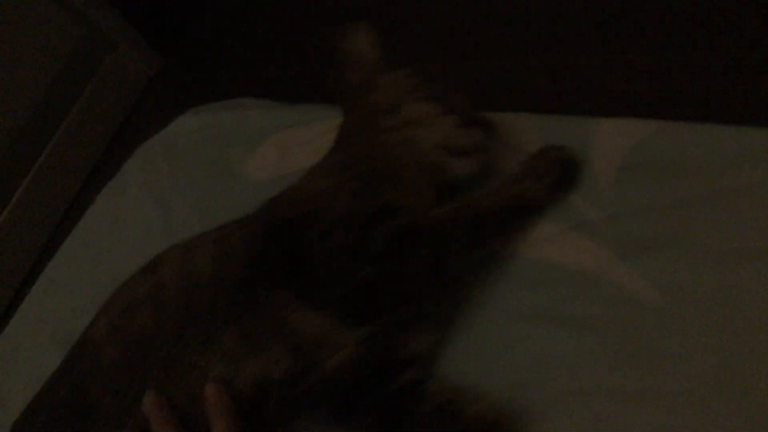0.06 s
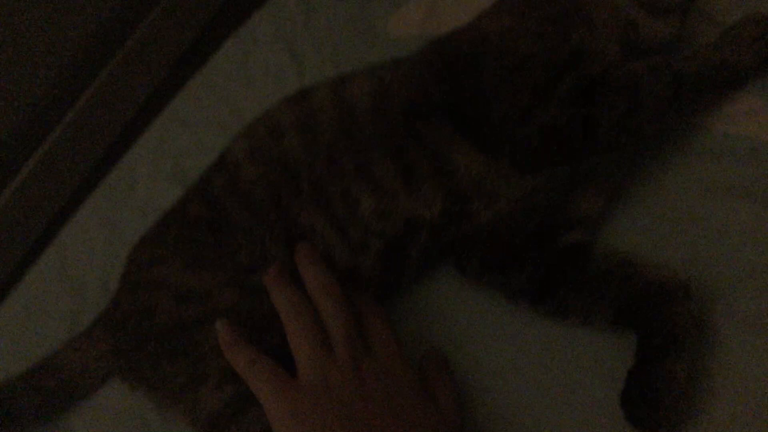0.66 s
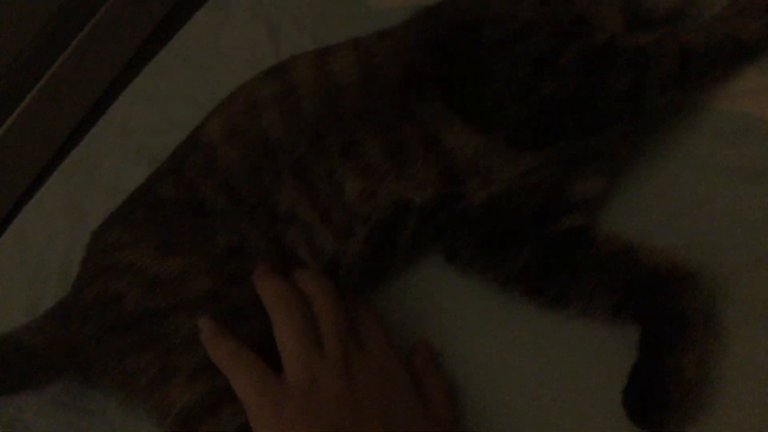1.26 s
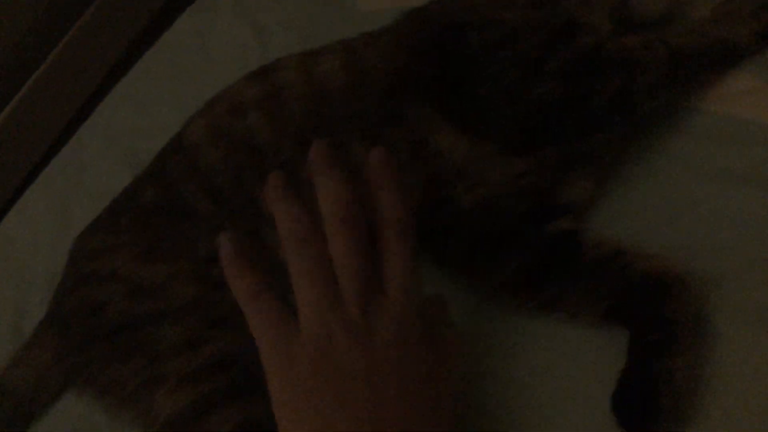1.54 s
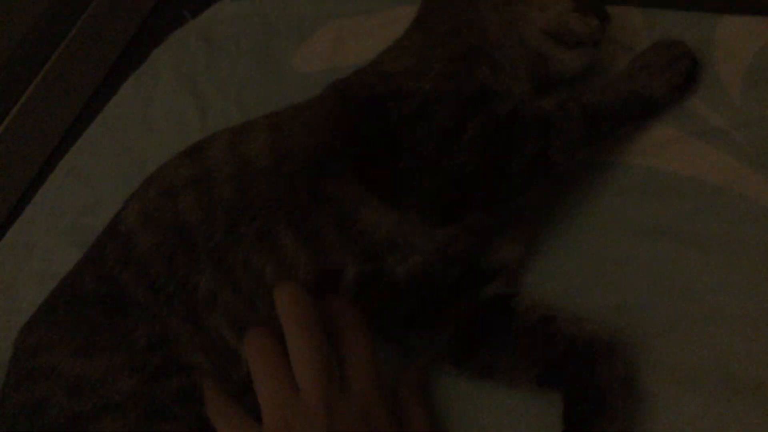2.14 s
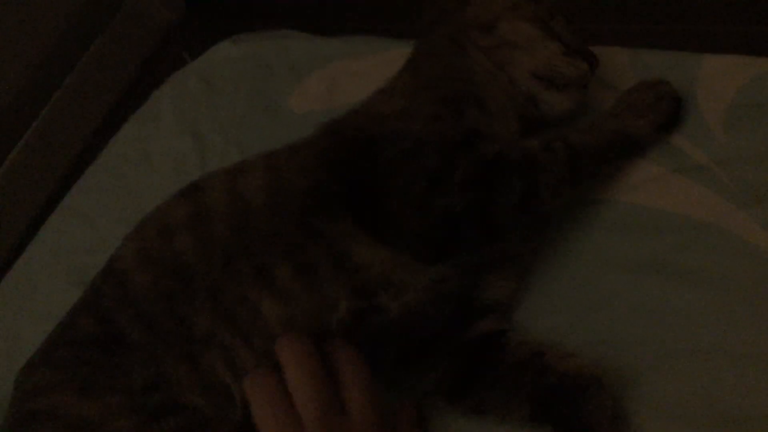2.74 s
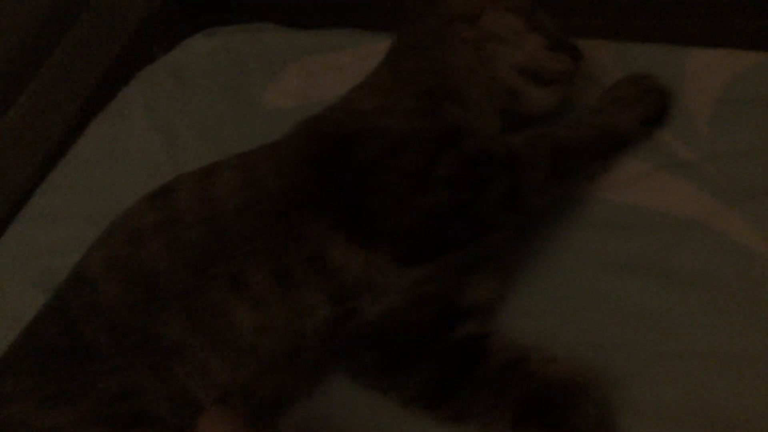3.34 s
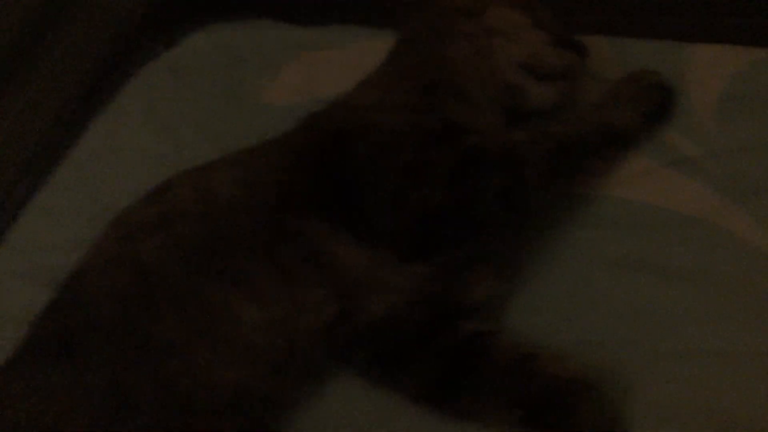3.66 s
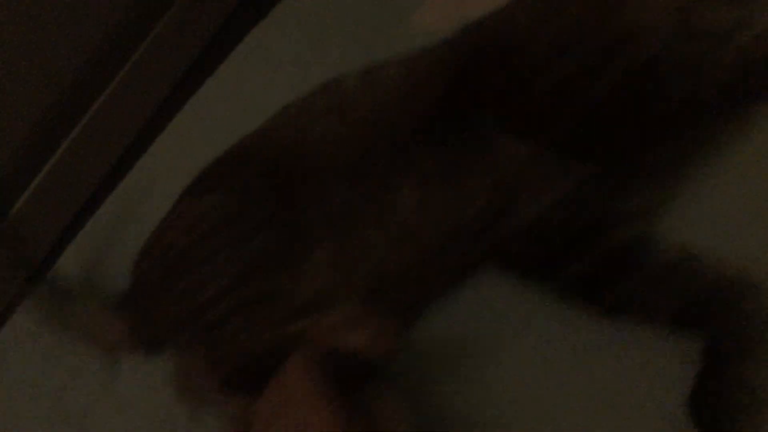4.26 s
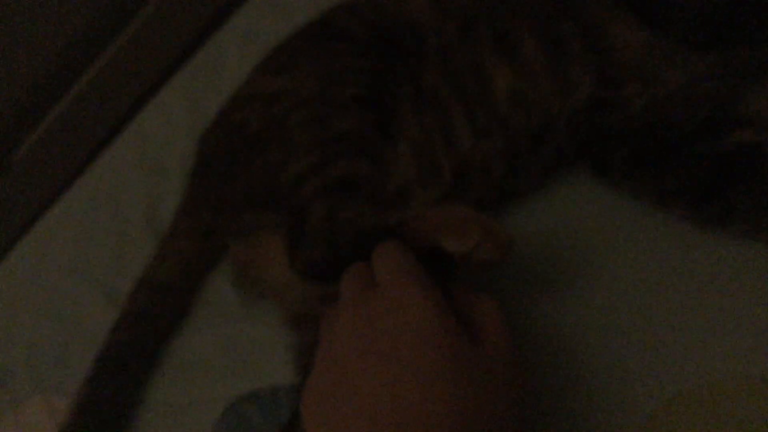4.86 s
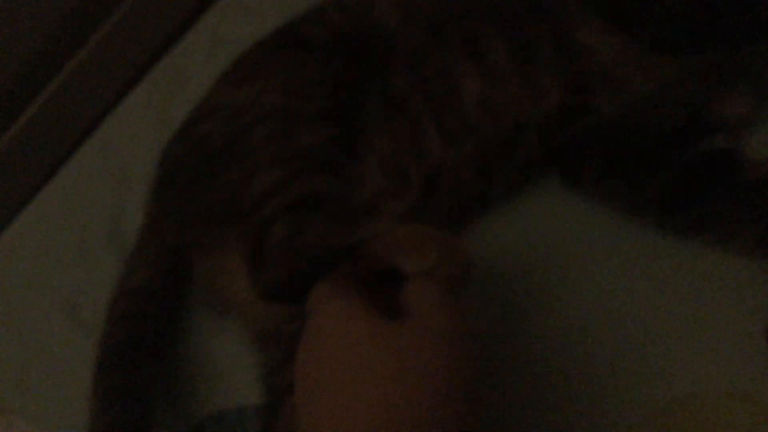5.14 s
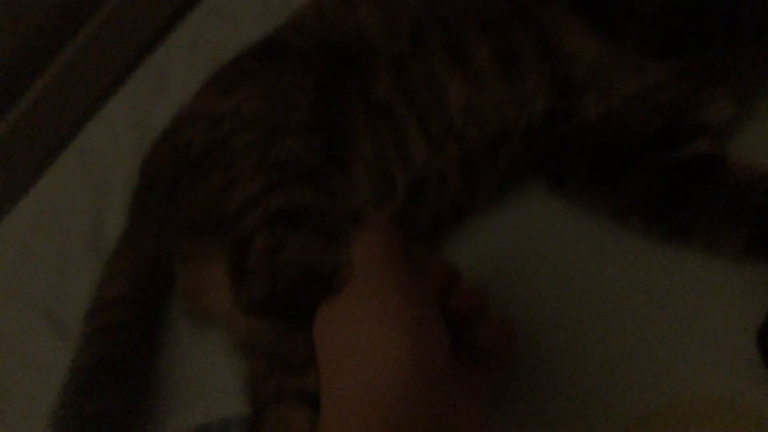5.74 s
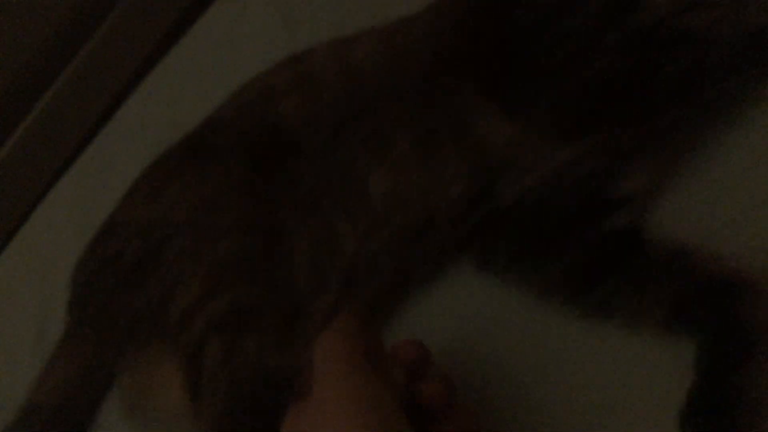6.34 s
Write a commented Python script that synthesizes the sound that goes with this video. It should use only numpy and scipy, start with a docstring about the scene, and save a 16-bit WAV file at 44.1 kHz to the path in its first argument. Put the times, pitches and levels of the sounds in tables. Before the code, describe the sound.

A quiet room holds a low motor hum, perhaps a fan, throbbing about three times a second over a faint, even hiss. A hand stroking a cat on bedding makes a brief soft sweep at the very start, then a barely audible rustle throughout. Something loose gives five dull, similar knocks at about 0.8, 1.9, 3.0, 4.0 and 5.4 seconds, each with a tiny bounce and a short room echo. Right at the microphone, fingers slip on the camera, each slip a scuff, tick and low thump, at about 0.6, 0.9, 1.5, 3.0 and 4.9 seconds, with a weaker one at 5.4. The strongest, near 4.9, is followed by a few soft bumps. The palm adds low rumbles, and muffled rubs come between 3.7 and 4.5 seconds. After a slight rumble at 6 seconds, the hum carries on to the end.

```python
"""A quiet room, where a hand strokes a cat on bedding and a motor, perhaps a fan, hums with a slow throb.
Fur and sheet rustle faintly over an even hiss. Up close, fingers shift on the camera: the palm rubs
and rumbles, and each slip scuffs, ticks and thumps the case. Five dull, alike knocks of something
loose bounce briefly and die away in the room."""
import sys
import numpy as np
from scipy import signal
from scipy.fft import rfft, irfft, next_fast_len
from scipy.io import wavfile
from scipy.ndimage import uniform_filter1d

SR = 44100
rng = np.random.default_rng(int(sys.argv[2]) if len(sys.argv) > 2 else 0)


def unload_wav(signal):
    """Save mono or channel-first audio to the path in sys.argv[1] as 16-bit WAV at rate SR, clipped to [-1, 1]."""
    wavfile.write(
        sys.argv[1],
        SR,
        np.round(np.clip(np.atleast_2d(signal).T, -1, 1) * 32767).astype(np.int16),
    )


N = 290590
TIME = np.arange(N) / SR


def undb(db):
    """Decibels to gain."""
    return 10 ** (np.asarray(db) / 20)


def colour(x, eq):
    """EQ a sound with a (frequency [Hz], level [dB]) curve and bring it to rms 1."""
    hz, db = np.transpose(eq)
    size = next_fast_len(len(x), True)
    bins = np.maximum(np.fft.rfftfreq(size, 1 / SR), 1)
    gain = undb(np.interp(np.log(bins), np.log(hz), db))
    y = irfft(rfft(x, size) * gain, size)[:len(x)]
    return y / np.std(y)


def noise(eq):
    """Smooth, coloured noise."""
    return colour(rng.standard_normal(N), eq)


def drift(rate):
    """Random modulator: values held 1 / rate seconds and slewed twice."""
    hold = int(SR / rate)
    steps = np.repeat(rng.standard_normal(N // hold + 1), hold)[:N]
    y = uniform_filter1d(uniform_filter1d(steps, hold), hold)
    return y / np.std(y)


def friction(eq, grain_db):
    """Grainy rub: dense tiny slips of uneven size."""
    return colour(rng.standard_normal(N) * undb(grain_db * np.clip(drift(1500), -2, 2)), eq)


def swell(start, attack_s):
    """Envelope with a quick attack to 1 and a slower release."""
    age = np.maximum(TIME - start, 0) / attack_s
    return age * np.exp(1 - age)


def decay(t, t60):
    """Envelope that falls 60 dB in t60 seconds."""
    return np.exp(-np.log(1000) * t / t60)


def strike(start, modes, contact_s, pitch=1):
    """Modes rung by a soft push; a longer contact is duller."""
    t = TIME[:SR // 5]
    ring = sum(np.sign(polarity) * undb(db) * np.sin(2 * np.pi * hz * pitch * t) * decay(t, t60)
               for hz, db, t60, polarity in modes)
    push = np.sin(np.pi * np.minimum(t / contact_s, 1)) ** 2
    ring = signal.fftconvolve(ring, push / push.sum())[:len(t)]
    return np.interp(TIME, t + start - contact_s / 2, ring, left=0, right=0)


# Dark room air and bright microphone hiss: (frequency [Hz], level [dB])
AIR_EQ = [(22, -41), (33, -11), (45, -15), (70, 0.5), (95, -2.5), (130, 3.5), (185, 0), (230, -9.5),
          (280, -8.5), (345, -13), (420, -21.5), (750, -24), (920, -29.5), (1200, -27), (2500, -40),
          (6000, -57)]
HISS_EQ = [(500, -2.5), (3000, 7.5), (5500, 2.5), (7600, 0.5), (8300, 3.5), (9500, 4), (10300, 1),
           (12000, 2), (13700, -5), (14400, -21), (15200, -24)]

def room_tone(air_db=-59.0, hiss_db=-85.0, waver_db=0.43):
    """The bed: low room noise under the even hiss of the microphone."""
    return undb(air_db + waver_db * drift(6.0)) * noise(AIR_EQ) + undb(hiss_db) * noise(HISS_EQ)


# Faint side tones of the motor: (frequency [Hz], level [dB])
MOTOR_TONES = [(48.5, -72.5), (194, -70.5), (264, -80), (291.5, -80.5), (629.8, -89.5), (872.1, -93),
               (921.5, -101)]

def motor_hum(pitch_hz=146.14, level_db=-54.5, throb_db=2.5, period_s=0.335, crest_s=0.28):
    """One strong motor tone throbs three times a second over a few faint, wavering ones."""
    throb = np.cos(2 * np.pi * (TIME - crest_s) / period_s)
    main = undb(level_db + throb_db * throb) * np.sin(2 * np.pi * pitch_hz * TIME + 0.067 * drift(8.2))
    faint = sum(undb(db + 2 * drift(5.5)) * np.sin(2 * np.pi * hz * TIME + drift(2))
                for hz, db in MOTOR_TONES)
    return np.sqrt(2) * (main + faint)


# Fader ride of the hand sweeping onto the fur and coming to rest: (time [s], level [dB])
SWEEP_FADE = [(0, -65), (.06, -77), (.13, -80), (.22, -104), (.3, -110)]
# Soft rustle of the petting and of the sweep: (frequency [Hz], level [dB])
FUR_EQ = [(300, -6), (700, 7.5), (1400, 2), (2100, 6), (3000, 0), (4000, -11), (6000, -7.5), (8000, -23),
          (14000, -39)]
SWEEP_EQ = [(500, -2), (1300, -5), (2200, -2), (3000, -12.5), (3900, -11.5), (5000, -19), (9000, -27)]

def fur_strokes(level_db=-83.5, pressure_db=0.05, flutter_db=2.0):
    """Hairs and threads slip under the hand: one brisk sweep, then light, fluttering petting."""
    touch = undb(level_db + pressure_db * drift(2.5) + flutter_db * drift(25))
    petting = touch * friction(FUR_EQ, grain_db=0.5)
    sweep = undb(np.interp(TIME, *np.transpose(SWEEP_FADE))) * friction(SWEEP_EQ, grain_db=4.5)
    return petting + sweep


# Cues for the camera turning in the hand: (peak time [s], half length [s], level [dB])
TURN_CUES = [(0.667, 0.11, -66), (3.718, .14, -64), (3.965, .06, -67.5), (4.485, .13, -67)]
# Their muffled tone: (frequency [Hz], level [dB])
TURN_EQ = [(120, -21), (220, -2), (320, 1.5), (400, -12.5), (550, -23), (800, -22.5), (1500, -33),
           (6000, -55)]

def case_turns():
    """The case rolls against the palm: a dull rub swells and fades."""
    speed = sum(undb(db) * np.exp(-((TIME - peak) / half) ** 2) for peak, half, db in TURN_CUES)
    return speed * friction(TURN_EQ, grain_db=4)


# Cues for the palm dragging as the grip settles: (time [s], rumble level [dB], hiss level [dB])
DRAG_CUES = [(0.603, -51.5, -79), (0.927, -50.5, -76.5), (1.54, -56.5, -100), (2.03, -57.5, -84.5),
             (3.05, -52.5, -85), (3.58, -77, -78), (4.26, -61, -87), (5.016, -50.5, -75.5),
             (5.17, -56.5, -89), (6.0, -62, -81)]
# The drag's low end and airy top: (frequency [Hz], level [dB])
RUMBLE_EQ = [(30, -49), (50, -17), (68, 9), (100, 1), (200, -3.5), (400, -30), (900, -76)]
SKIN_EQ = [(1000, 7), (4000, 2), (7000, -4.5), (12000, -5), (15500, -13)]

def palm_drags(attack_s=0.047):
    """The palm creeps on the case and settles: a rumble through the body and a thin hiss."""
    rumble, hiss = noise(RUMBLE_EQ), friction(SKIN_EQ, grain_db=3.5)
    return sum(swell(start, attack_s) * (undb(rumble_db) * rumble + undb(hiss_db) * hiss)
               for start, rumble_db, hiss_db in DRAG_CUES)


# Body of the hand-damped case: (frequency [Hz], level [dB], decay t60 [s], polarity [+/-])
CASE_MODES = [(169, 6, 0.012, -1), (118.4, 0.5, 0.03, 1), (365, -7.5, 0.023, 1), (573, -12.5, 0.012, -1)]

def case_thump(start, contact_s):
    """A push on the case gives a low, choked thump."""
    return strike(start, CASE_MODES, contact_s)


# Cues for fingers settling on the case: (time [s], level [dB], contact [s])
BUMP_CUES = [(0.6244, -29, 0.0041), (4.9363, -34, 0.003), (4.9465, -28, 0.0034), (5.045, -36.5, 0.0035),
             (5.057, -33.5, 0.0047)]

def finger_bumps():
    """Finger pads land softly, without a slip."""
    return sum(undb(db) * case_thump(start, contact_s) for start, db, contact_s in BUMP_CUES)


def case_sway(start, hz, t60=0.12, attack_s=0.0057, lag_s=0.011):
    """Bass tail of a thump: the camera wobbles in the hand."""
    t = np.maximum(TIME - start - lag_s, 0)
    return 2 * np.sin(2 * np.pi * hz * t) * (1 - np.exp(-t / attack_s)) * decay(t, t60)


# Skin scraping the case, before the tilt: (frequency [Hz], level [dB])
SCUFF_EQ = [(300, -1), (720, 9.5), (950, -1), (1300, 2.5), (2200, -0.5), (3400, -0.5), (4100, -5),
            (5800, -8.5), (7500, -20), (9500, -14.5), (10800, -17.5), (12500, -18), (15500, -18)]

def skin_scuff(catch, tilt_db, slip_s=0.0045, stop_s=0.0011, tail_s=0.066, tail_db=-19, grain_db=4):
    """Skin slides ever harder in tiny jerks, then sticks; a faint rustle lingers."""
    t = TIME[:SR // 4] - TIME[SR // 20]  # zero at the catch
    jerks = rng.standard_normal(len(t)) * undb(grain_db * np.clip(drift(4000)[:len(t)], -2, 2))
    skin = colour(jerks, [(hz, db + tilt_db * np.log2(hz)) for hz, db in SCUFF_EQ])
    before, after = np.minimum(t, 0), np.maximum(t, 0)
    release = np.exp(-after / stop_s) + undb(tail_db) * np.exp(-after / tail_s)
    speed = np.exp(before / slip_s) * release
    return np.interp(TIME, t + catch, speed * skin, left=0, right=0)


# Cues for fingers slipping: (time [s], scuff level [dB], tick level [dB], thump level [dB],
# contact [s], thump lag [s], sway frequency [Hz], sway level against the thump [dB])
SLIP_CUES = [(0.605, -52.5, -53, -29.5, 0.0039, -0.0051, 85, -18.5),
             (0.9229, -53.5, -56.5, -21.5, 0.0028, 0.0003, 61, -28),
             (1.538, -56.5, -52.5, -24.5, 0.007, 0.0026, 72, -23),
             (3.0384, -50.5, -49.5, -21, 0.0014, 0.00028, 67, -23),
             (4.928, -50, -54.5, -17, 0.0028, -.0002, 68, -20.5),
             (5.44, -60.5, -60, -32.5, 0.0019, -0.0051, 76, -15)]
# Bright ring of the hard shell: (frequency [Hz], level [dB], decay t60 [s], polarity [+/-])
SHELL_MODES = [(696, -14, 0.08, 1), (803, -12.5, 0.2, 1), (1100, -12.5, 0.073, 1), (1280, -21.5, 0.12, 1),
               (2072, -11, 0.05, -1), (2480, -33, 0.043, 1), (3190, -15, 0.049, 1), (4500, -33, 0.024, -1),
               (5270, -20, 0.033, 1), (6660, -31, 0.0091, -1), (8900, -11.5, 0.0089, 1),
               (12900, -8, 0.002, -1)]

def finger_slips(rebound_s=0.0138, rebound_db=-13.0, pitch_spread=0.025, flat_db=-20, tilt_per_db=0.47):
    """A finger scuffs and catches with a tick; the case thumps, rebounds and sways."""
    mix = 0
    pitches = 1 + pitch_spread * rng.standard_normal(len(SLIP_CUES))  # each finger spot rings differently
    for cue, pitch in zip(SLIP_CUES, pitches):
        start, scuff_db, tick_db, thump_db, contact_s, lag_s, sway_hz, sway_db = cue
        tick = strike(start, SHELL_MODES, 3 / SR, pitch)
        tilt_db = tilt_per_db * (thump_db - flat_db)  # per octave: a firmer grip scuffs brighter
        mix += undb(scuff_db) * skin_scuff(start, tilt_db) + undb(tick_db) * tick
        hit = start + lag_s
        thump = case_thump(hit, contact_s) + undb(rebound_db) * case_thump(hit + rebound_s, contact_s)
        mix += undb(thump_db) * (thump + undb(sway_db) * case_sway(hit, sway_hz))
    return mix


# Dark tone of the room's reverb: (frequency [Hz], level [dB])
REVERB_EQ = [(50, 10.5), (110, -6.5), (200, 3), (270, -4), (360, -0.5), (500, -4), (900, 8), (3000, -21),
             (9000, -50)]

def room_reverb(x, t60=0.49, wet_db=-6.5, build_s=0.029):
    """Diffuse reflections build up and die away."""
    t = TIME[:SR]
    tail = noise(REVERB_EQ)[:SR] * decay(t, t60) * (1 - np.exp(-(t / build_s) ** 2))
    low_mids = np.abs(rfft(tail))[100:400]  # the wet level holds for 100-400 Hz
    return undb(wet_db) * signal.fftconvolve(x, tail)[:N] / np.sqrt(np.mean(low_mids ** 2))


# Cues for the knocks: (time [s], level [dB], rasp level against the knock [dB], pitch [ratio])
KNOCK_CUES = [(0.7704, -32.5, -36, 0.98), (1.9394, -30.5, -44.5, 1.0), (2.962, -29.5, -41.5, 0.97),
              (4.0495, -32, -44, .98), (5.4135, -33.5, -35.5, 0.96)]
# Four quick contacts inside each knock: (delay [s], level [dB])
KNOCK_BOUNCES = [(0, 3), (.0074, 0.5), (0.0148, 0.5), (0.0194, -4)]
# Body of the loose object: (frequency [Hz], level [dB], decay t60 [s], polarity [+/-])
KNOCK_MODES = [(97, -9.5, 0.13, 1), (232.3, 0.5, 0.029, -1), (350.4, -6, 0.11, 1), (476, -17, 0.052, -1),
               (850, -42, 0.066, 1), (1199, -13, 0.098, 1)]
# Grit of its contact surfaces: (frequency [Hz], level [dB])
RASP_EQ = [(400, -20), (800, -4), (1250, -4.5), (1700, -15), (2500, -10), (5000, -33), (12000, -52)]

def loose_knocks(contact_s=0.0023, rasp_attack_s=0.011):
    """Something loose lands five soft, bouncing blows, each with a light rasp and a room tail."""
    direct = sum(undb(db + bounce_db) * strike(start + delay, KNOCK_MODES, contact_s, pitch)
                 for start, db, _, pitch in KNOCK_CUES for delay, bounce_db in KNOCK_BOUNCES)
    rub = sum(undb(db + rasp_db) * swell(start, rasp_attack_s) for start, db, rasp_db, _ in KNOCK_CUES)
    rasp = rub * friction(RASP_EQ, grain_db=-1.5)
    return direct + rasp + room_reverb(direct)


def scene():
    """Mono mix: knocks and handling up front, fur, motor and room tone behind."""
    front = loose_knocks() + finger_slips() + finger_bumps() + case_turns() + palm_drags()
    return (front + fur_strokes() + motor_hum() + room_tone())[None]


def record(dry):
    """The camera rolls off the sub bass and cuts the very top steeply."""
    low_cut = signal.butter(4, 36, "high", fs=SR, output="sos")
    high_cut = signal.ellip(8, 0.2, 70, 15400, fs=SR, output="sos")
    return signal.sosfilt(high_cut, signal.sosfiltfilt(low_cut, dry))


dry = scene()
out = record(dry)
unload_wav(out)
```